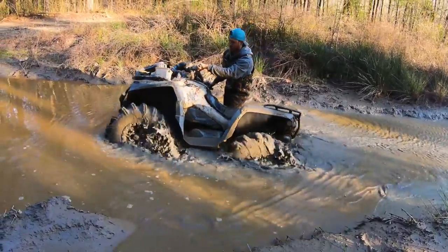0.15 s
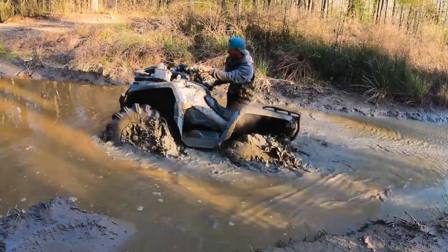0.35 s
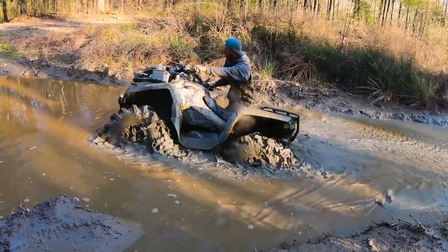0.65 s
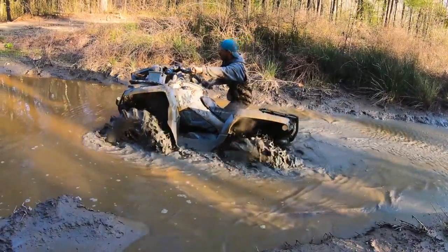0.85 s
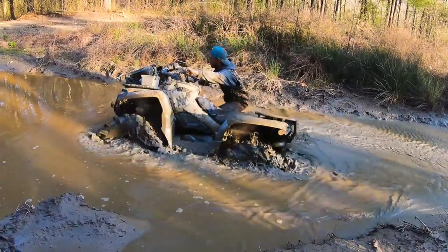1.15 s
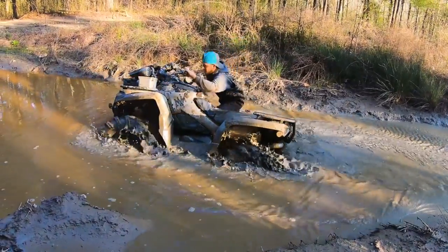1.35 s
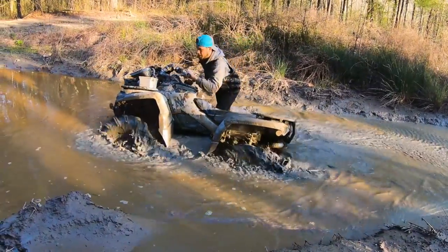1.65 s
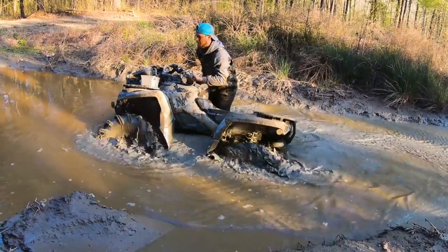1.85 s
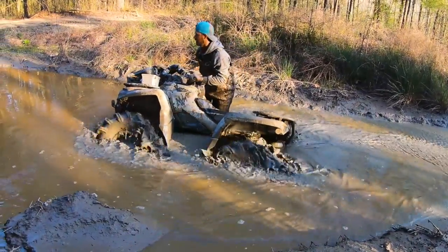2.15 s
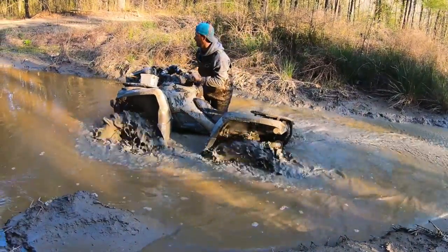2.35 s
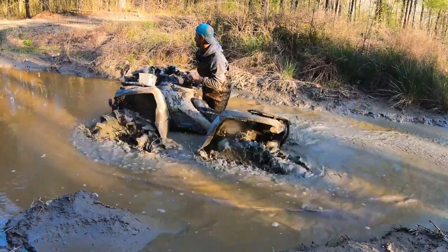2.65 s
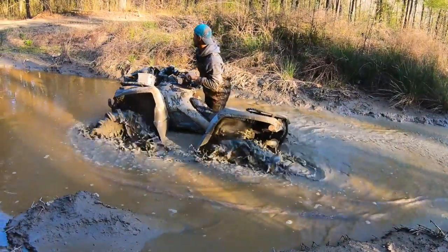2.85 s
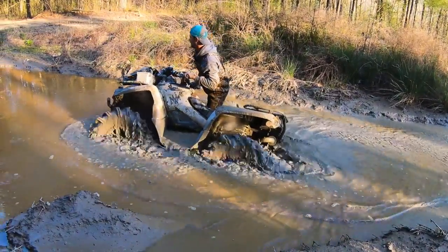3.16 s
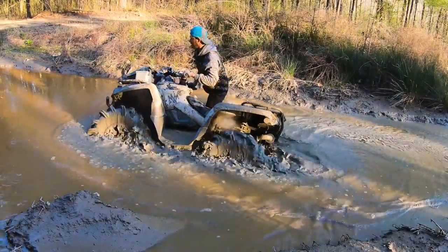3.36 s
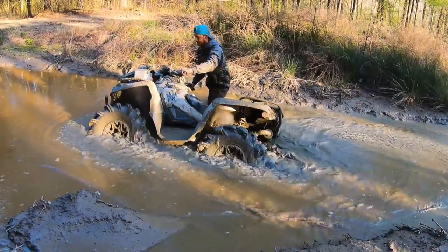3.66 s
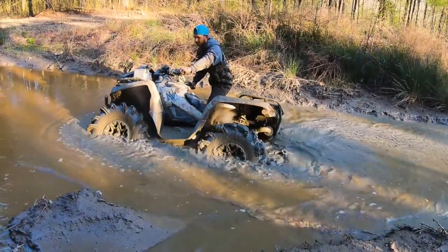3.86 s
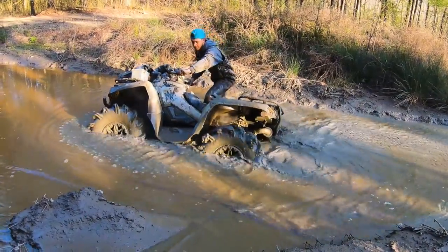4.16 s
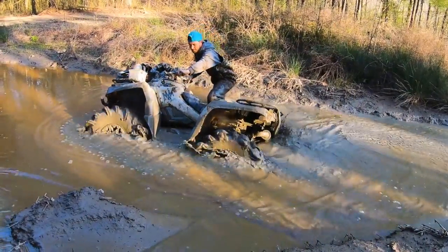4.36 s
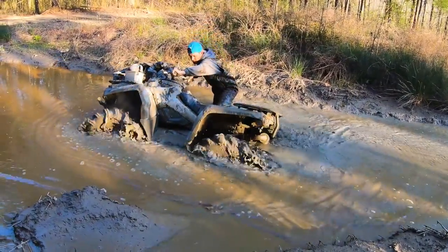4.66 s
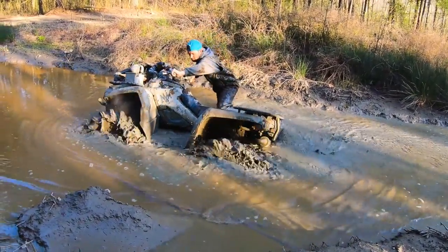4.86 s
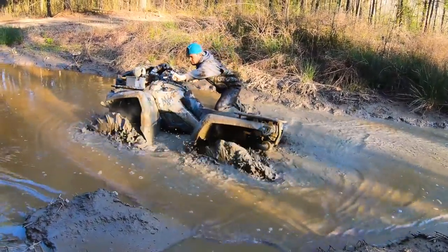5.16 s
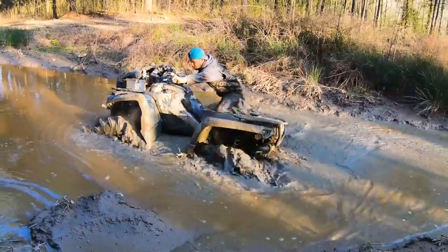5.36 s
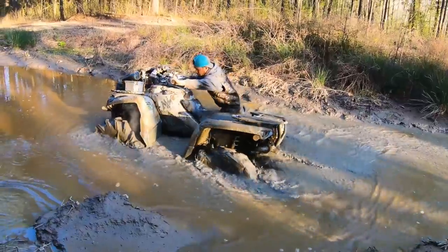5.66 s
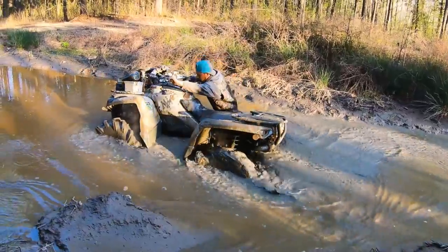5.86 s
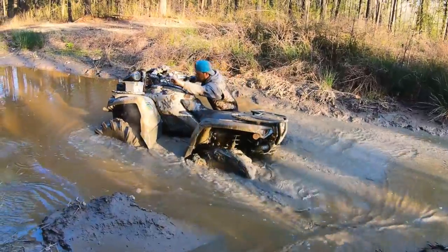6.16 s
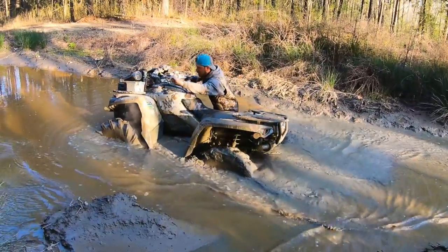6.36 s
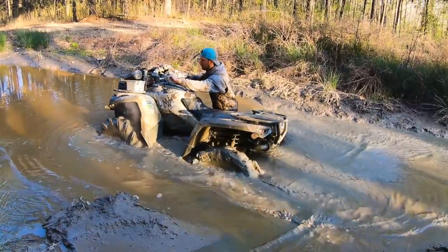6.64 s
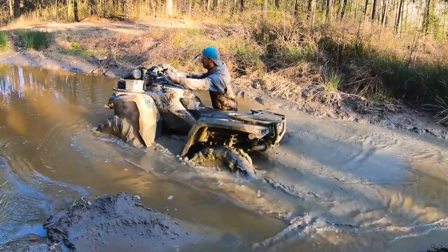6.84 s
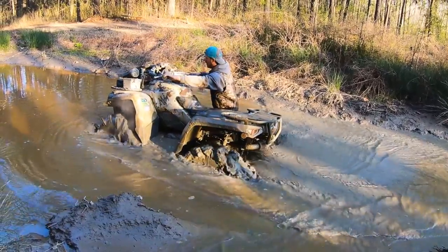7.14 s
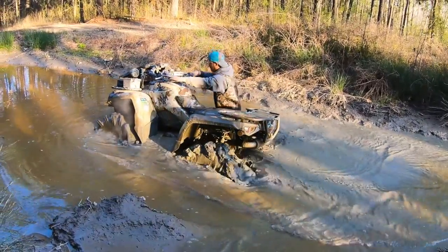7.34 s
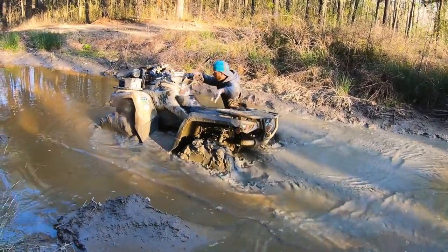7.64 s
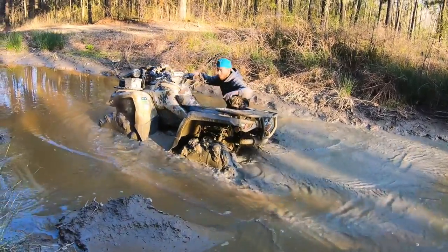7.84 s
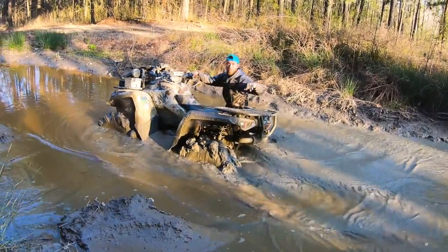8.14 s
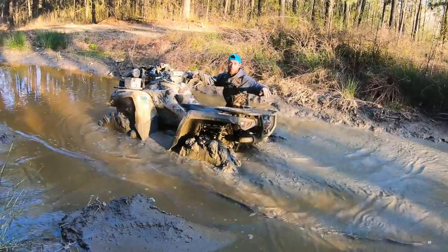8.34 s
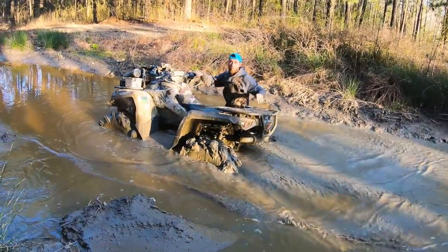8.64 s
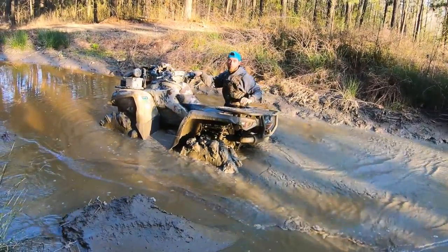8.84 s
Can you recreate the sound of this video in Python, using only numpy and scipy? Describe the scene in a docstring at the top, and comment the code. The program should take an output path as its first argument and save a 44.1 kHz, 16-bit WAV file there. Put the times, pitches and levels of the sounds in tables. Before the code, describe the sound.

A quad bike engine labours in a muddy water hole, its submerged exhaust gurgling and booming, breaking into raspy barks as tyres churn the slosh.

```python
"""Quad bike labouring in a mud hole

A single-cylinder quad's tailpipe dips in and out of the water: every firing thumps, booms and gurgles through
pipe resonances, and in the open it also barks, rings and spits. Splashes are hiss bursts. A twin-cylinder machine
idles close to the phone, noise bands make the mud churned by the tyres, and the banks scatter the engines."""
import sys
import numpy as np
from scipy import signal
from scipy.fft import rfft, irfft
from scipy.io import wavfile
from scipy.ndimage import uniform_filter1d

SR = 44100
rng = np.random.default_rng(int(sys.argv[2]) if len(sys.argv) > 2 else 0)


def dump_mix(stems):
    """Bounce the given channels to the path in sys.argv[1] as a 16-bit WAV at rate SR."""
    frames = np.atleast_2d(stems).T  # one column per channel
    limited = np.clip(frames, -1, 1)  # hard clip at full scale
    pcm = np.round(limited * 32767).astype(np.int16)
    wavfile.write(sys.argv[1], SR, pcm)


N = 396900

# Quad engine speed. Each row: time in seconds, firings per second.
SPEED = [(.15, 26.5), (.4, 30), (1.4, 31.3), (1.85, 22.5), (2.0, 27.5), (2.4, 35), (3.4, 21), (4.1, 22),
         (4.35, 26.5), (4.8, 29.5), (5.5, 26), (5.8, 17), (5.92, 21.5), (6.27, 18.5), (6.45, 24.5),
         (6.68, 21.5), (6.95, 28.5), (7.22, 19.5), (7.7, 16.3), (8.0, 13.7), (8.9, 13.1)]
# Spells with the tailpipe out of the water. Each row: first and last firing in seconds, first and last bark
# level in dB, hollow ring level in dB, spit level in dB, pitch of the hollow blown in the water in Hz,
# rise of the thump in dB, rise of the boom in dB (a negative rise counts as none).
SURFACINGS = [(.15, .225, -36, -28, -37, -55, 232, 5.5, 12.5),
              (.388, .452, -16, -17, -37, -40, 242.6, 3.5, 5),
              (1.077, 1.367, -17, -10, -17.5, -52, 174.3, 9.5, -1),
              (1.839, 1.84, -18, -12, -36, -54, 188, -9, -3),
              (1.883, 1.929, -7, -13, -19, -54, 186.6, 13, 7),
              (1.96, 2.07, -7, -3.5, -20.5, -59, 195, 6, 11),
              (2.165, 2.262, -22, -26, -30.5, -52, 192, 4, 13.5),
              (2.32, 2.434, -15.5, -11, -25, -53, 204, 7.5, 17.5),
              (2.599, 2.6, -25, -24, -34, -39, 212, 12, 15.5),
              (3.995, 4.13, -29, -6, -23.5, -38.5, 225.6, 8, 18),
              (4.346, 4.53, -12, -17.5, -30, -41.5, 211.3, 8, 9.5),
              (4.625, 4.838, -13, -18, -37.5, -41, 217, 5, 4),
              (4.905, 5.231, -14, -23, -26.5, -40.5, 177, 6, 7.5),
              (5.798, 5.903, -8, -4, -22, -35, 175.7, -3.5, 7.5),
              (6.045, 6.046, -7, -8, -22.5, -42, 174.3, 6.5, 17),
              (6.267, 6.453, -7, -7, -21, -34.5, 173, 1.5, 0),
              (6.68, 6.96, -7, -4.5, -29.5, -35.5, 178, 9.5, -3),
              (7.005, 7.337, -19, -26, -40, -36.5, 178.4, 1, 6.5),
              (7.377, 7.426, -3.5, -7, -38, -31.5, 188, 3, 1),
              (7.535, 7.57, -24, -9.5, -32.5, -34, 183, 0.5, 3),
              (7.636, 7.816, -22, -23, -46, -36.5, 192, -2.5, -10),
              (7.865, 7.866, -22, -19, -24.5, -35.5, 172.5, -1.5, -2),
              (8.004, 8.901, -52, -44, -37.5, -55, 169.5, 1, 8.5)]
# Firings that stand out from their spell. Each row: time in seconds, bark and hollow above the spell's level in dB.
STANDOUTS = [(1.078, 5.5, -4.5), (1.142, -2, -3.5), (1.178, -3, -0.5), (1.208, 3, 3), (1.304, 2.5, -15),
             (1.336, 2, 0.5), (1.369, -15, 4), (1.931, 1, 5), (1.997, -0.5, -1), (2.067, -9.5, -8),
             (3.995, -2, -4), (4.082, 8.5, 0.5), (4.385, -6.5, -9), (4.452, 7, 3), (4.695, 1.5, 8.5),
             (4.944, 2, 5), (5.013, -11, 1), (5.084, -3, 8.5), (5.122, 8, 7), (5.191, -13, -13),
             (6.81, 2, -9), (6.96, -10.5, 6.5), (7.571, -2.5, 9.5), (7.753, 3.5, -7)]


def quad():
    """Every firing thumps, gurgles and booms under water; those in the open bark as well."""
    times = firings()
    level = undb(load(np.arange(N) / SR)[0])
    return (thump(times) + gurgle(times)) * level + deep_note(times) + boom(times) + bark(times)


def firings():
    """Firing times at engine speed, fitted so that spell ends and standouts lie on or close to a firing."""
    s = np.arange(N) / SR
    turns = np.cumsum(curve(SPEED, s)[0]) / SR
    spell_ends = np.array(SURFACINGS)[:, :2].ravel()
    marks_s = np.sort(np.r_[0, spell_ends, np.array(STANDOUTS)[:, 0], s[-1]])
    marks = np.interp(marks_s, s, turns)
    fill = [np.linspace(a, b, round(b - a), endpoint=False) for a, b in zip(marks, marks[1:])]
    return np.interp(np.concatenate(fill), turns, s)


def load(s):
    """Thump dB, boom dB and hollow pitch at times s: slow firings hit harder, a shallow pipe may add a rise."""
    rise_s, sink_s = 0.064, 0.1  # the pipe nears the surface before a spell and sinks after it
    shallow = [np.interp(s, [row[0] - rise_s, row[0], row[1], row[1] + sink_s], [0, 1, 1, 0]) for row in SURFACINGS]
    rises = [np.multiply.outer(row[7:], share) for row, share in zip(SURFACINGS, shallow)]
    thump_rise_db, boom_rise_db = np.max(rises, axis=0)
    octaves = octaves_above_25(s)
    spell_ends = np.array(SURFACINGS)[:, :2].ravel()
    hollow_hz = np.interp(s, spell_ends, np.repeat([row[6] for row in SURFACINGS], 2))
    thump_db = -24 - 6 * octaves + thump_rise_db
    boom_db = -26.5 - 1.5 * octaves + boom_rise_db
    return thump_db, boom_db, hollow_hz


def octaves_above_25(s):
    """Engine speed at times s in octaves above 25 firings per second."""
    return np.log2(curve(SPEED, s)[0] / 25)


def thump(times):
    """Each firing kicks the exhaust resonances, a little harder or softer by chance."""
    # Each row: resonance in Hz, width in Hz, level in dB.
    quad_pipe = [(35.6, 16, -17), (52.7, 45, -7.5), (118.8, 16.6, 4), (163.8, 20, -2), (306, 50, -14)]
    sizes = undb(1.5 * rng.standard_normal(len(times)))
    return pipe(train(times + .002, sizes), quad_pipe)


def gurgle(times):
    """Gas under water bursts up after each firing as a wet puff of noise."""
    t = clock(.09)
    bursts = train(times + .006, undb(3 * rng.standard_normal(len(times))))
    puff = signal.fftconvolve(bursts, fade(t, 0.14) * (1 - fade(t, 0.018)))[:N]
    noise = rng.standard_normal(N)
    return puff * (undb(-15.0) * unit(steep(noise, 330, 270)) + undb(-39.0) * unit(band(noise, 4300, 2800)))


def deep_note(times):
    """The silencer's deepest note, rung by every firing, wakes up at slow firings."""
    level_db = np.interp(np.arange(N) / SR, times, -37.5 - 15.5 * octaves_above_25(times))
    return unit(steep(train(times, 1.), 49.6, 17)) * undb(level_db)


def boom(times):
    """Each firing strikes the hollow that the gas blows in the water: decaying partials."""
    # Hollow struck under water. Each row: multiple of its pitch, level in dB, t60 in seconds.
    boom_modes = [(1, 4.5, 0.12), (2.15, -15.5, 0.17)]
    t = clock(.09)
    _, boom_db, hollow_hz = load(times)
    level_db = boom_db + 2 * rng.standard_normal(len(times)) + standout(times)[1][:, 1]
    attack = 1 - fade(t, 0.0095)
    return place(times, [-undb(db) * hollow(t, hz, boom_modes) * attack for hz, db in zip(hollow_hz, level_db)])


def bark(times):
    """Firings in the open: a crack with the pipe's rasp, a ring of the hollow with froth, and a spit of water."""
    # Hollow struck in the open. Each row: multiple of its pitch, level in dB, t60 in seconds.
    hollow_modes = [(2, 9, 0.085), (2.998, -0.5, 0.098), (4.2, -11, 0.12)]
    # Water chokes the pipe mouth and slows the front. Each row: time in seconds, pitch of the front in Hz.
    mouth = [(1.4, 572), (1.85, 860), (1.96, 600), (2.0, 960), (4.0, 553), (5.3, 640), (5.8, 804),
             (6.9, 1170), (7.6, 683)]
    t = clock(.09)
    open_air = np.array(open_firings(times))
    starts_s, count = open_air[:, 0], len(open_air)
    # front and ring pitch vary a little by chance from firing to firing
    front_hz = curve(mouth, starts_s)[0] * 2 ** (.12 * rng.standard_normal(count))
    ring_hz = load(starts_s)[2] * (1 + .015 * rng.standard_normal(count))
    gas = rng.standard_normal((count, len(t)))
    cracks, rasps, spits = crack(t, front_hz), rasp(gas, front_hz), spit(t, count)
    froth = unit(steep(gas, 308, 390))
    sounds = []
    for k, (_, bark_db, ring_db, spit_db) in enumerate(open_air):
        rasp_gain = undb(-22) * (front_hz[k] / 1000) ** 1.6
        blast = cracks[k] + rasp_gain * rasps[k] * fade(t, 0.07) * (1 - fade(t, 0.006))
        ring = hollow(t, ring_hz[k], hollow_modes, lag_s=.0016) + undb(1) * froth[k] * fade(t, 0.057)
        ring = ring * (1 - fade(t, 0.011))
        sounds.append(undb(bark_db) * blast + undb(ring_db) * ring + undb(spit_db) * spits[k])
    return place(starts_s, sounds)


def open_firings(times):
    """The firings in the open: (s, bark dB, ring dB, spit dB), scattered in level or set by the standouts."""
    extra_db = rng.standard_normal((len(times), 3)) * [1.5, 1.5, 2.5]
    odd, odd_db = standout(times)
    extra_db[odd, :2] = odd_db[odd]
    rows = []
    for first, last, first_db, last_db, ring_db, spit_db, *_ in SURFACINGS:
        for k, s in enumerate(times):
            if first - .005 < s < last + .005:
                bark_db = np.interp(s, [first, last], [first_db, last_db])
                rows.append((s, *(extra_db[k] + [bark_db, ring_db, spit_db])))
    return rows


def standout(times):
    """Which of the firings stand out, and by how many dB in bark and hollow."""
    near = np.abs(times[:, None] - np.array(STANDOUTS)[:, 0]) < .008
    return near.any(axis=1), near @ np.array(STANDOUTS)[:, 1:]


def crack(t, front_hz):
    """A pressure front swings a cycle and a half and returns from the pipe's far end, duller each time."""
    dull, return_s, return_db = 0.88, .0089, -4
    turns = front_hz[:, None] * (t - .0018)
    front = -np.cos(2 * np.pi * turns) * np.exp(-(turns / 0.29) ** 2)
    gap = np.zeros(int(return_s * SR) - 2)
    return signal.lfilter([1, -dull], np.r_[1, -dull, gap, -undb(return_db) * (1 - dull)], front)


def rasp(gas, front_hz):
    """Gas noise in the tailpipe's resonances, choked above the pitch of the front."""
    # Each row: resonance in Hz, width in Hz, level in dB.
    tailpipe = [(610, 90, 6.5), (782, 70, 8.5), (1140, 100, -4.5), (1600, 440, 2.5), (2500, 440, -8.5)]
    choke_db_per_octave = -8
    rasps = []
    # the resonances shift together a little by chance at each firing
    for noise, top_hz, shift in zip(gas, front_hz, .05 * rng.standard_normal(len(gas))):
        total = 0
        for hz, width_hz, db in tailpipe:
            choke_db = choke_db_per_octave * max(np.log2(hz / top_hz), 0)
            total = total + undb(db + choke_db) * unit(steep(noise, hz * (1 + shift), width_hz))
        rasps.append(total)
    return rasps


def spit(t, count):
    """Short hisses of water, each around its own pitch, with a fine mist on top."""
    fizz, mist = rng.standard_normal((2, count, len(t)))
    octaves = .28 * rng.standard_normal(count)
    hiss = np.array([steep(f, 3000 * 2 ** o, 1600) for f, o in zip(fizz, octaves)])
    return unit(hiss + undb(-10.5) * band(mist, 7900, 3000)) * fade(t, 0.038) * (1 - fade(t, 0.001))


def hollow(t, hz, modes, lag_s=0):
    """A struck gas hollow: decaying sine partials."""
    return sum(undb(db) * np.sin(2 * np.pi * m * hz * (t - lag_s)) * fade(t, t60_s) for m, db, t60_s in modes)


def splashes():
    """Water blown out of the pipe: short bursts of hiss, each around its own pitch, with a broad mist on top."""
    # Each row: start in seconds, level in dB, pitch in Hz.
    splash_rows = [(1.839, -29, 2160), (1.933, -35.5, 4900), (2.042, -32, 1490), (7.133, -36, 2600),
                   (7.534, -39, 2300), (7.695, -48, 3600), (7.751, -33, 3000), (7.814, -32, 2020)]
    t = clock(.09)
    envelope = fade(t, 0.078) * (1 - np.exp(-t / 0.00017))
    sounds = []
    for _, db, hz in splash_rows:
        noise = rng.standard_normal(len(t))
        burst = unit(steep(noise, hz, 0.49 * hz)) + undb(-7.5) * unit(band(noise, 4100, 4600))
        sounds.append(undb(db) * burst * envelope)
    return place([row[0] for row in splash_rows], sounds)


def idler():
    """Two cylinders fire unevenly in each cycle, a little early or late, weak or strong by chance."""
    # Each row: time in seconds, level in dB.
    idle = [(0, -15), (4, -17.5), (6.3, -15), (7, -17), (9, -15)]
    # Each row: resonance in Hz, width in Hz, level in dB.
    idle_pipe = [(69.8, 13.6, -0.5), (92.1, 5.9, -9.5), (140.3, 20.9, -2), (160.2, 33, -15),
                 (198, 42.7, -7.5)]
    cycles_per_s, start_cycles, count = 11.93, .6, 110
    pulses = 0
    for lag_cycles, db in [(0, -7.5), (.38, -9.5)]:
        late, size = rng.standard_normal((2, count))
        times = (np.arange(count) + lag_cycles + 0.016 * late - start_cycles) / cycles_per_s
        heard = (times > 0) & (times < N / SR)
        pulses = pulses + train(times[heard], undb(db + 1.5 * size[heard]))
    return pipe(pulses, idle_pipe) * undb(curve(idle, np.arange(N) / SR)[0])


def churned_mud():
    """Tyres churn the water: a low slosh and a high spray, each following its own level."""
    # Each row: time in seconds, slosh level in dB, spray level in dB.
    churn = [(0, -31.5, -48), (1.5, -34.5, -50), (2.3, -33, -51.5), (2.9, -33.5, -46), (3.4, -36, -51.5),
             (3.8, -40.5, -56), (4.4, -34.5, -51.5), (4.9, -32.5, -50), (5.6, -35.5, -49.5),
             (5.8, -40, -54.5), (7.1, -39.5, -55), (7.9, -44, -57), (9, -41.5, -55)]
    # Each row: band centre in Hz, level in dB.
    slosh_bands = [(330, 4.5), (750, -0.5), (1100, -2.5), (1520, -4.5), (2200, -1.5), (3200, -5.5)]
    # Each row: band centre in Hz, level in dB.
    spray_bands = [(5800, 15.5), (7500, 11.5), (9200, 11)]
    slosh_db, spray_db = curve(churn, np.arange(N) / SR)
    slosh = water(slosh_bands, -5.0, 2900)
    slosh += undb(-1.0) * band(slosh, 1530, 130)  # a narrow resonance colours the slosh
    return undb(slosh_db) * slosh + undb(spray_db) * water(spray_bands, -3.1, 3000)


def water(bands, drops_db, alike_hz):
    """Noise bands that flicker together and alone, roughened by droplets; two channels, partly alike."""
    out, surge = 0, walk(18.0)
    drop_sizes = undb(3.0 * np.minimum(rng.exponential(size=N), 4))
    drops = uniform_filter1d((rng.random(N) < 400 / SR) * drop_sizes, size=130) * 40
    for hz, db in bands:
        share = 1 / (1 + hz / alike_hz)  # long waves reach both ports alike
        mid, left, right = unit(steep(rng.standard_normal((3, N)), hz, 0.39 * hz))
        both = np.sqrt(share) * mid + np.sqrt(1 - share) * np.array([left, right])
        flicker = undb(db + 0.45 * surge + 2.25 * walk(25))
        out = out + flicker * (1 + undb(drops_db) * drops) * both
    return unit(out)


def bank_scatter(engines):
    """The banks scatter the engines: a short decaying tail of band noise, different in each channel."""
    t = clock(.15)
    tail = unit(steep(rng.standard_normal((2, len(t))), 1910, 1300)) * fade(t, 0.048)
    return signal.fftconvolve(engines[None], tail, axes=1)[:, :N]


def undb(db):
    """Decibels to gain."""
    return 10 ** (np.asarray(db) / 20)


def curve(table, s):
    """Every column of a time table at the times s."""
    t, *columns = np.transpose(table)
    return [np.interp(s, t, c) for c in columns]


def unit(x):
    """Scale to rms 1."""
    return x / np.sqrt(np.mean(x ** 2, axis=-1, keepdims=True))


def clock(length_s):
    """Sample times in seconds."""
    return np.arange(int(length_s * SR)) / SR


def fade(t, t60_s):
    """Exponential decay by 60 dB in t60_s."""
    return np.exp(-np.log(1000) * t / t60_s)


def band(x, hz, width_hz):
    """One resonance, gain 1 at the centre."""
    return signal.lfilter(*signal.iirpeak(min(hz, .45 * SR), hz / width_hz, SR), x)


def steep(x, hz, width_hz):
    """A resonance with steep skirts: two in series, the second twice as wide."""
    return band(band(x, hz, width_hz), hz, 2 * width_hz)


def pipe(pulses, modes):
    """Pulses ring steep exhaust resonances of alternating sign."""
    rings = [undb(db) * unit(steep(pulses, hz, width_hz)) for hz, width_hz, db in modes]
    return -unit(sum((-1) ** k * ring for k, ring in enumerate(rings)))


def walk(rate_hz):
    """Random levels held 1 / rate_hz seconds and slewed twice."""
    k = int(SR / rate_hz)
    steps = np.repeat(rng.standard_normal(N // k + 1), k)
    return uniform_filter1d(uniform_filter1d(steps, k), k)[:N]


def train(times, sizes):
    """Impulses of the given sizes at the given times."""
    out = np.zeros(N)
    np.add.at(out, np.clip((times * SR).astype(int), 0, N - 1), sizes)
    return out


def place(starts_s, sounds):
    """Add each sound at its start."""
    out = np.zeros(N + len(sounds[0]))
    for s, sound in zip(starts_s, sounds):
        i = int(s * SR)
        out[i:i + len(sound)] += sound
    return out[:N]


def scene():
    """Engines heard direct and scattered off the banks, over the churned mud."""
    engines = quad() + splashes() + idler()
    return engines + undb(-35.0) * bank_scatter(engines) + churned_mud()


def record(dry):
    """The phone's body shades the left port in the treble; gain is ridden, peaks are rounded, the top rolls off."""
    # The two microphone ports. Each row: frequency in Hz, left minus right in dB, lead of the left in radians.
    ports_table = [(60, -.8, 0), (330, -1.5, -.15), (600, -4.5, -.4), (1050, -7.5, .5), (1800, -5, .5),
                   (3300, -4.5, .3), (5800, -5, -1.3), (8500, -13, -1.3), (12000, -2, -1)]
    size = N + 4096
    log_hz = np.log(np.maximum(np.fft.rfftfreq(size, 1 / SR), 1))
    port_hz, *columns = np.transpose(ports_table)
    tilt_db, lead_rad = (np.interp(log_hz, np.log(port_hz), c) for c in columns)
    half = undb(tilt_db / 2) * np.exp(.5j * lead_rad)
    ports = irfft(rfft(dry, size) * np.array([half, 1 / half]), size)[:, :N]
    # gain control: the louder the last moments (60 ms), the lower the gain
    keep = np.exp(-1 / (.06 * SR))
    power = signal.lfilter([1 - keep], [1, -keep], np.mean(ports ** 2, axis=0), zi=[undb(-25)])[0]
    ports = ports * (power / undb(-35.5)) ** -.15
    rounded = np.tanh(0.93 * ports) / 0.94
    soft_top = signal.sosfilt(signal.butter(3, 10300, fs=SR, output="sos"), rounded)
    return signal.sosfilt(signal.ellip(8, .2, 70, 15500, fs=SR, output="sos"), soft_top)


dry = scene()
out = record(dry)
dump_mix(out)
```